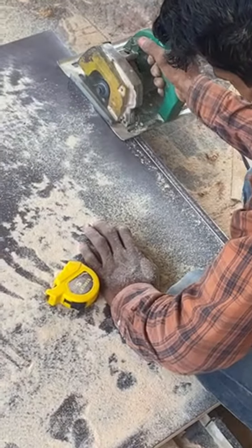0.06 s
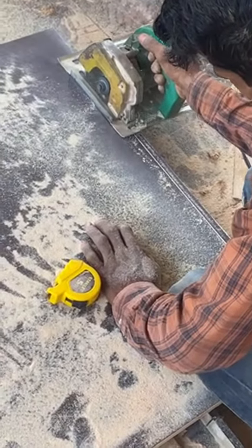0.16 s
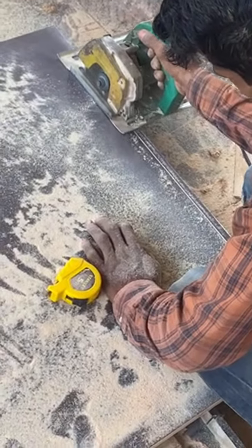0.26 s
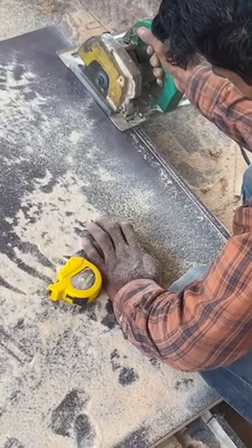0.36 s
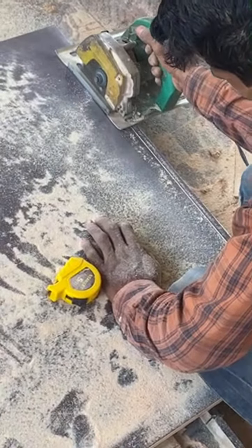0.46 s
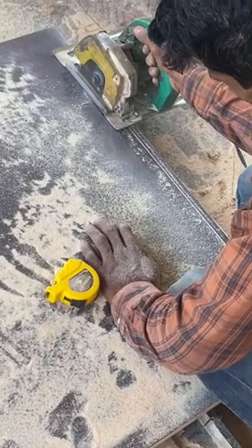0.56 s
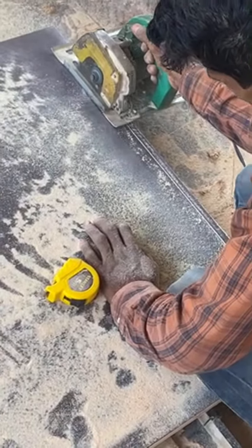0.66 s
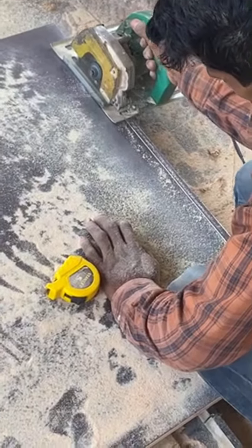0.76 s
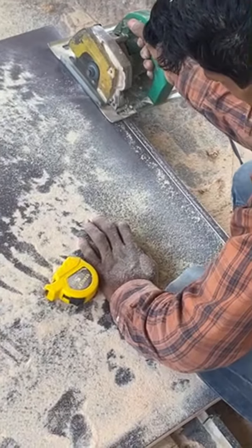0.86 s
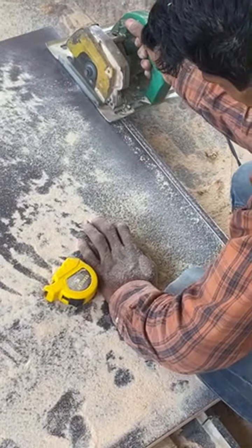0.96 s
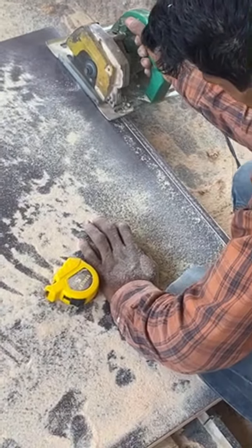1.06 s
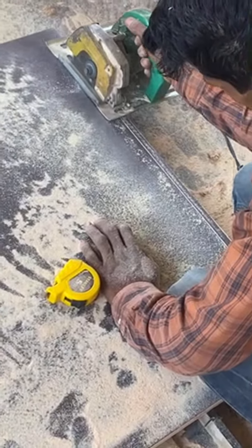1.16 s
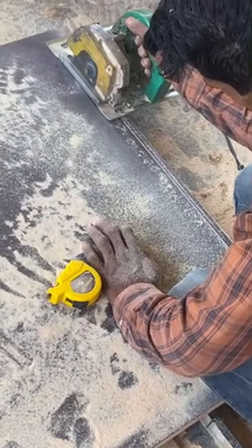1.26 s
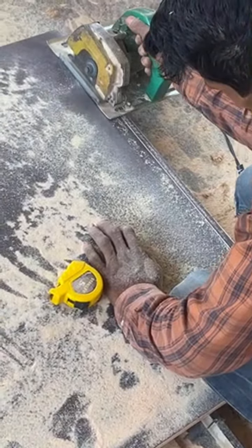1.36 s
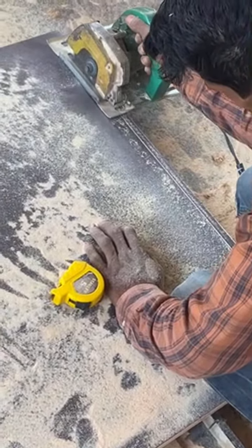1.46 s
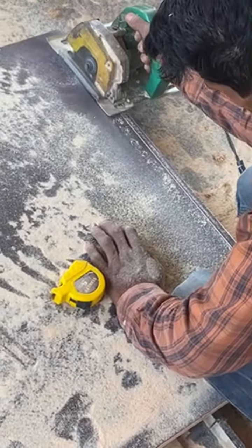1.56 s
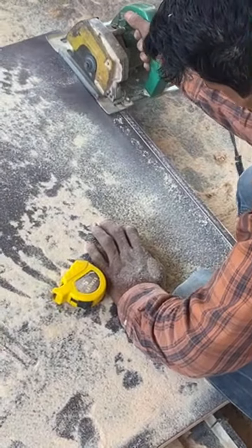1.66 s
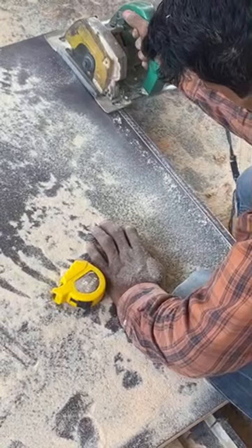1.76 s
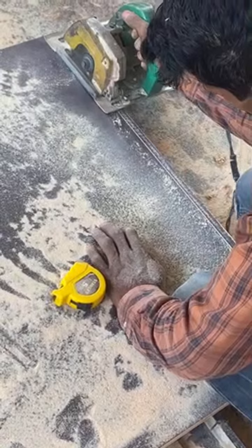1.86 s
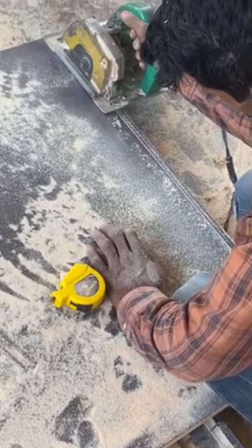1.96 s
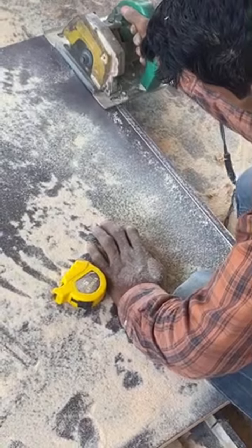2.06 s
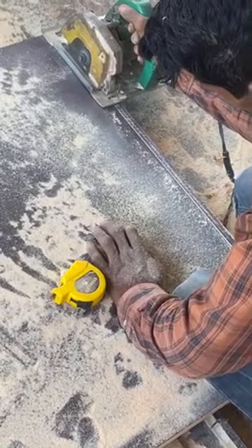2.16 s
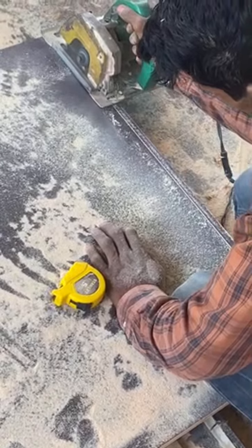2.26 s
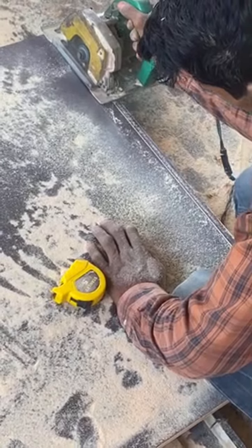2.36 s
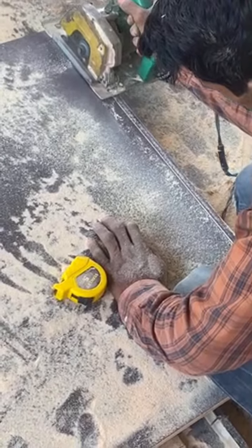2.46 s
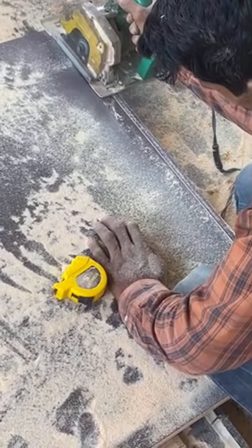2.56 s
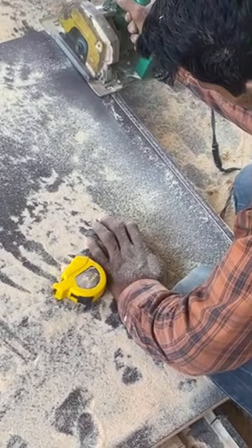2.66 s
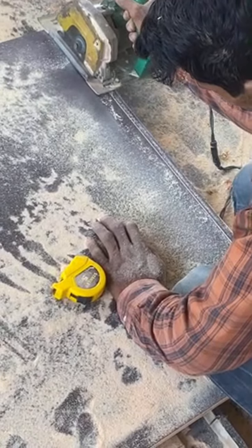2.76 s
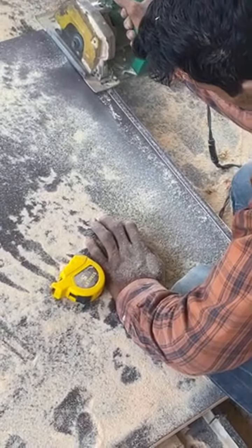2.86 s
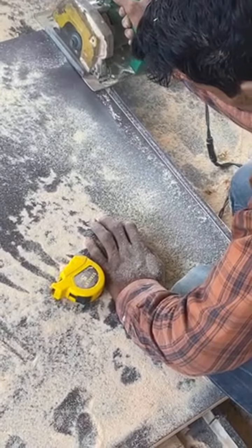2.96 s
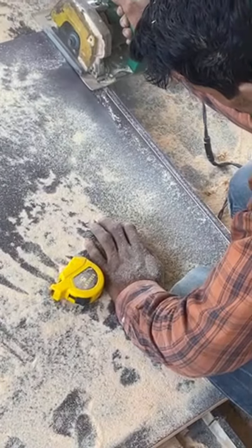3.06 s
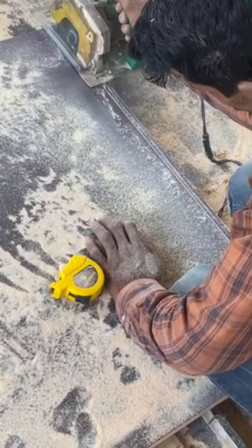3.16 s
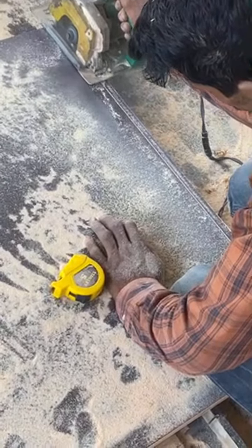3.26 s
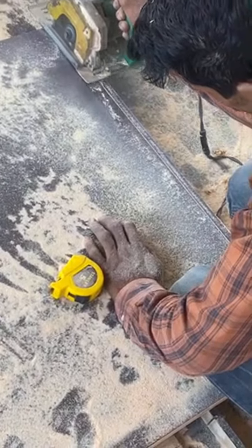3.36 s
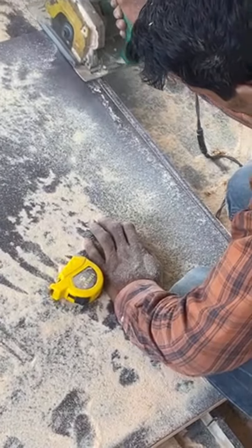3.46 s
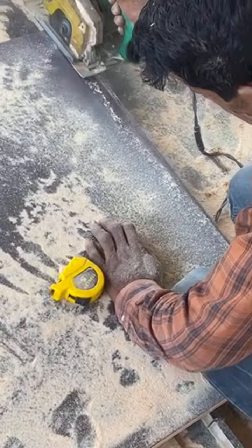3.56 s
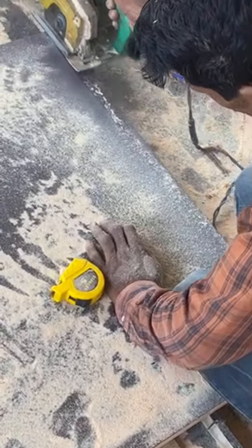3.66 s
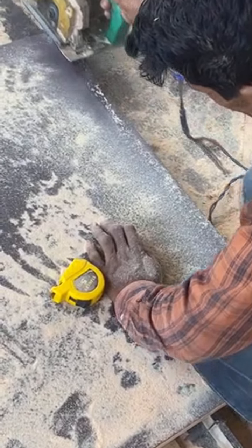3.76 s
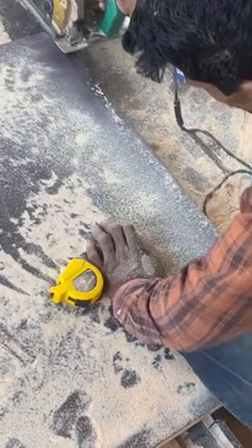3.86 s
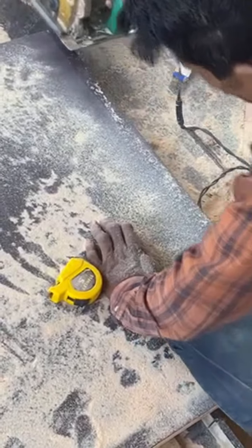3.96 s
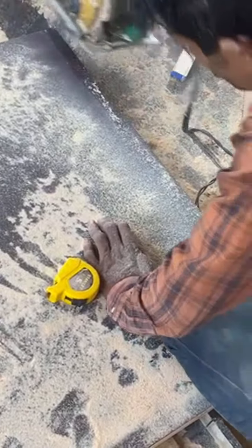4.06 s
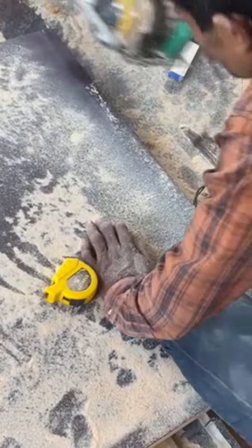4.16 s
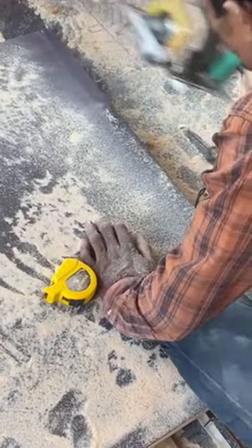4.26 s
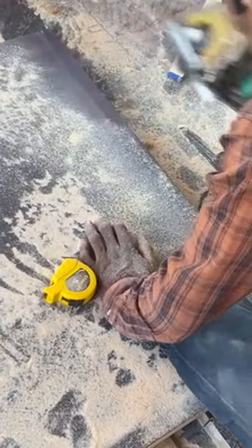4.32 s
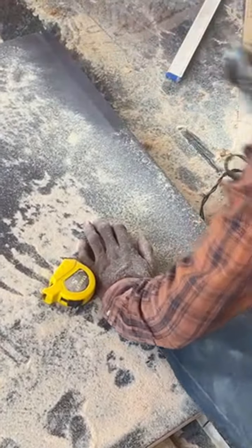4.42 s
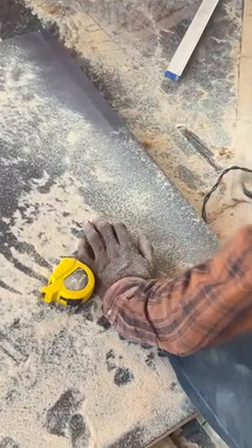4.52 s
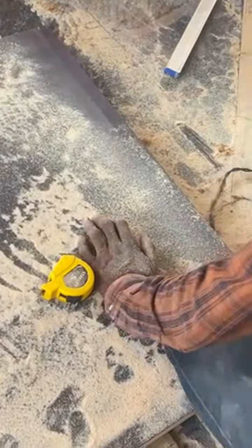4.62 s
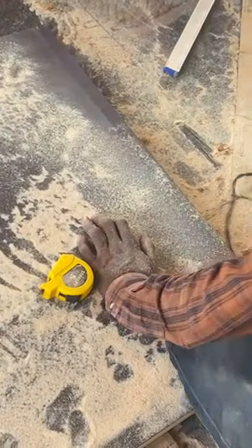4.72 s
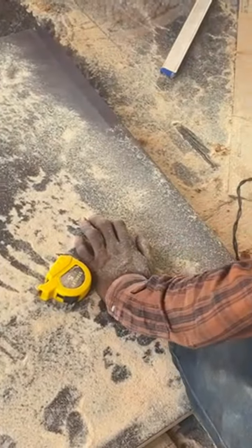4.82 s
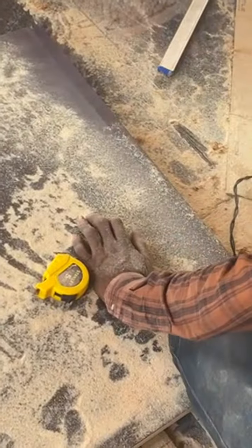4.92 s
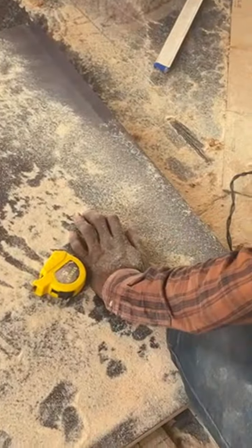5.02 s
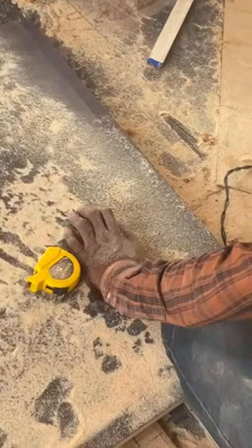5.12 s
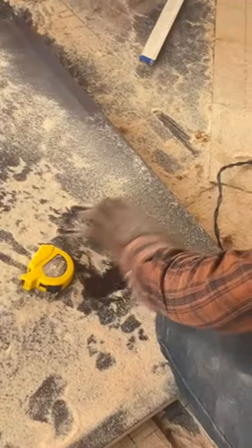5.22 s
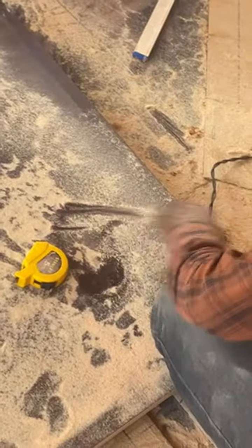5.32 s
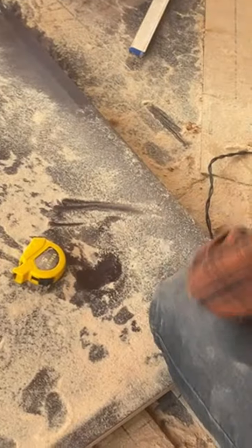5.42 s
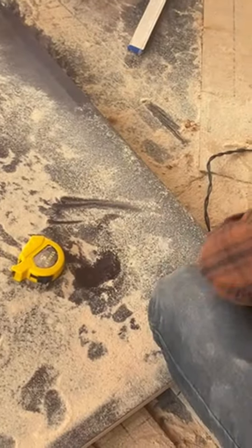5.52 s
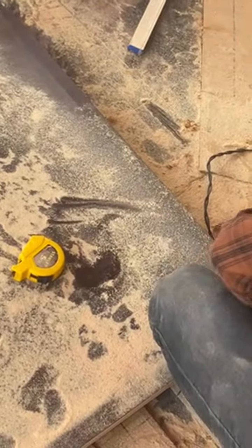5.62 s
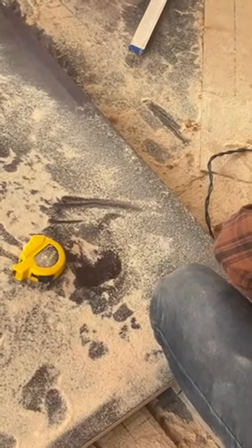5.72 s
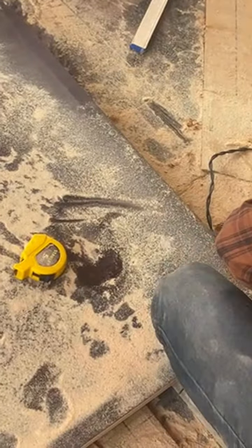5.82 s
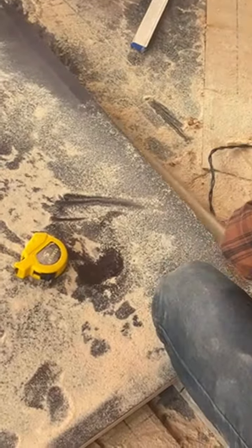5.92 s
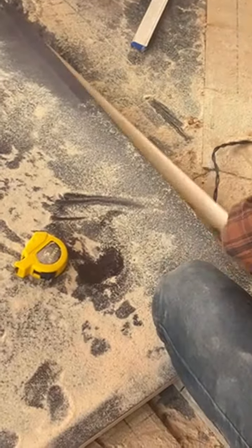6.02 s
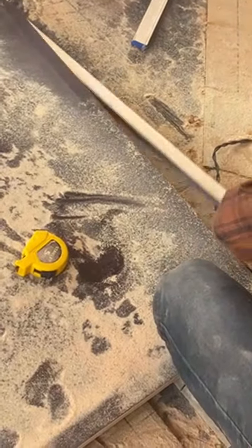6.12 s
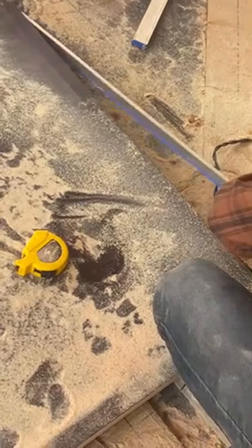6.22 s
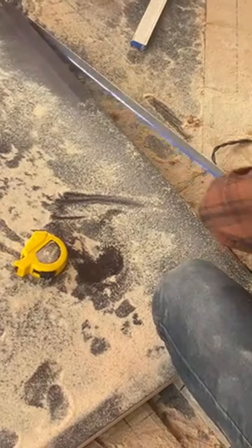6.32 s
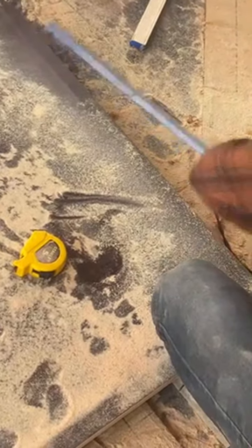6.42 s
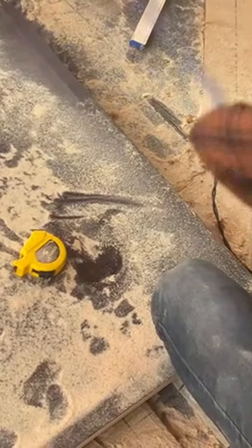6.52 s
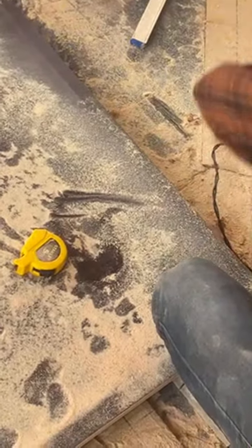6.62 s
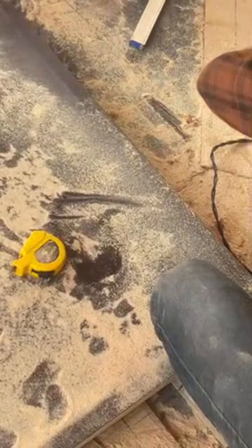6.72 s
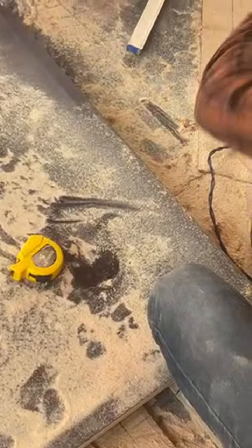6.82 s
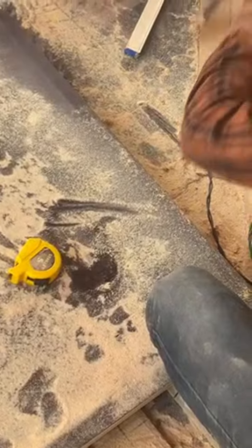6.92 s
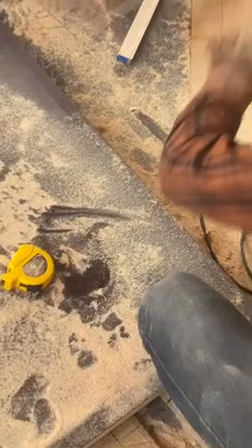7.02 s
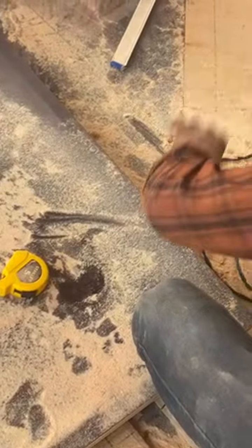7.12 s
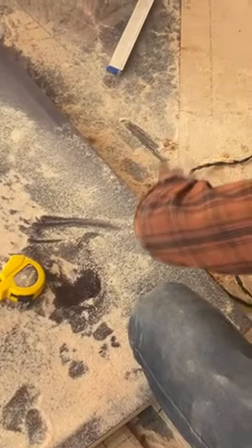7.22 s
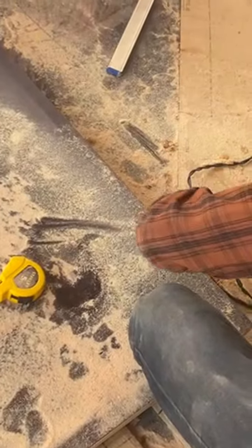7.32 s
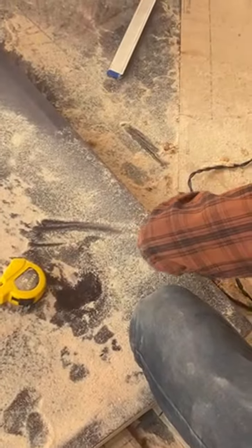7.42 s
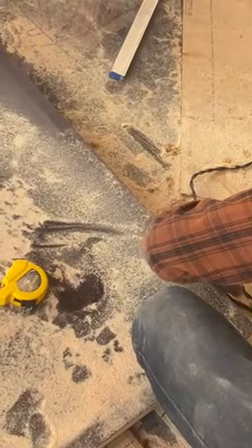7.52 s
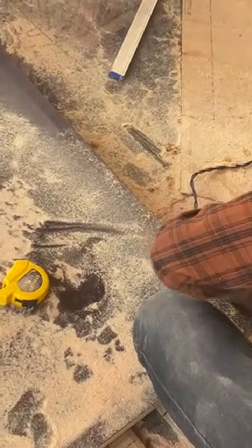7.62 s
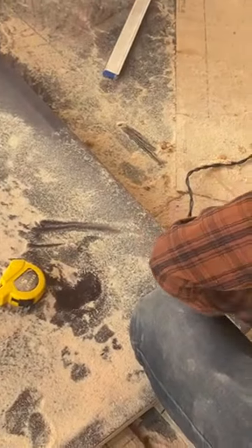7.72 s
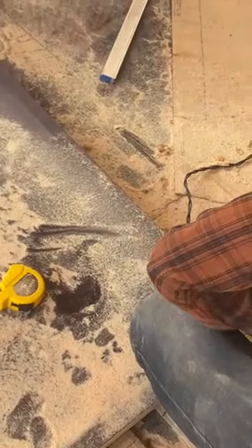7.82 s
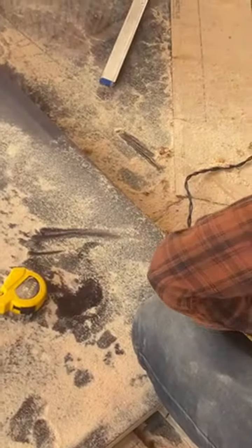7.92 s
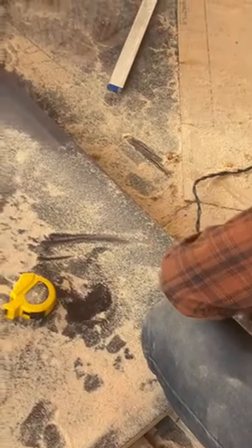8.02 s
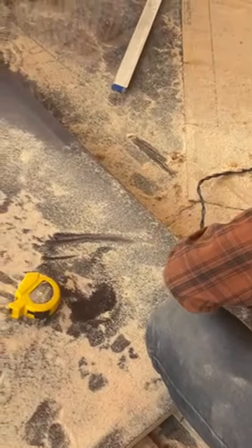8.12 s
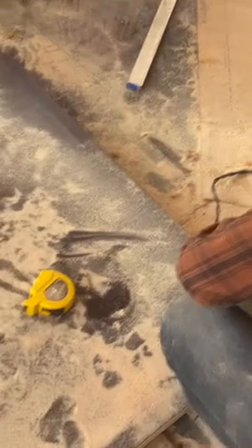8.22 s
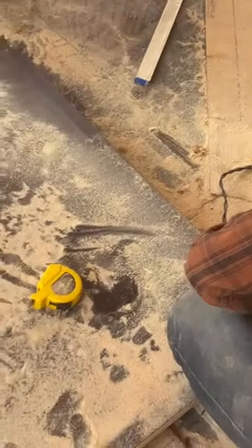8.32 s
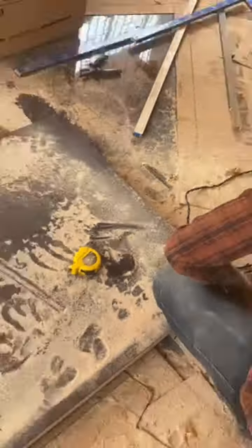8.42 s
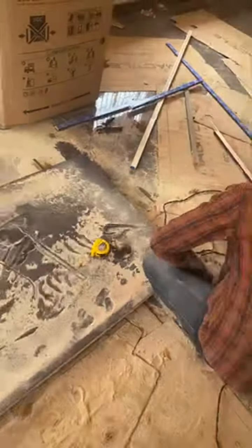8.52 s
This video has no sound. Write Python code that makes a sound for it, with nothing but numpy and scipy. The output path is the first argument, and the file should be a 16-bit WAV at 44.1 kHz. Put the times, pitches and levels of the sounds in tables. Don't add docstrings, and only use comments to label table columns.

```python
import sys
import numpy as np
from scipy import signal
from scipy.fft import rfft, irfft, next_fast_len
from scipy.io import wavfile
from scipy.ndimage import uniform_filter1d, map_coordinates

SR = 44100
rng = np.random.default_rng(int(sys.argv[2]) if len(sys.argv) > 2 else 0)


def int16_out(signal):
    q = np.round(np.clip(np.atleast_2d(signal).T, -1, 1) * 32767)
    wavfile.write(sys.argv[1], SR, q.astype(np.int16))


def ratio(d):
    e = np.asarray(d, float) / 20
    return 10 ** e


N = 378359
TIME_S = np.arange(N) / SR
MAINS_PHASE = 2 * np.pi * 100 * TIME_S
EXIT_S = 3.77


def unit(x):
    return x / np.sqrt(np.mean(x ** 2) + 1e-20)


def curves(rows):
    s, *columns = np.transpose(rows)
    return [np.interp(TIME_S, s, column) for column in columns]


def wobble(rate_hz):
    coarse = np.arange(0, N + 32, 32)
    knots = rng.standard_normal(int(N * rate_hz / SR) + 4)
    return np.interp(np.arange(N), coarse, map_coordinates(knots, [coarse * rate_hz / SR]))


def swells(weights, middle_s, half_s):
    coarse = np.arange(0, N + 32, 32)
    distance = coarse / SR - np.asarray(middle_s)[:, None]
    bells = np.exp(-(distance / np.asarray(half_s)[:, None]) ** 2)
    return np.interp(np.arange(N), coarse, weights @ bells)


def filtered(x, response):
    m = next_fast_len(N + 8192)
    spectrum = rfft(x, m) * response(np.fft.rfftfreq(m, 1 / SR))
    return unit(irfft(spectrum, m)[:N])


def below(x, top_hz):
    m = next_fast_len(N)
    return irfft(rfft(x, m) * (np.fft.rfftfreq(m, 1 / SR) < top_hz), m)[..., :N]


def colour(points):
    freq_hz, level_db = np.transpose(points)
    return lambda hz: ratio(np.interp(np.log(hz + 1), np.log(freq_hz + 1), level_db))


def body(peaks, base, lo_hz, hi_hz):
    def response(f):
        power = base(f) ** 2
        for centre_hz, width_hz, level_db in peaks:
            power = power + ratio(2 * level_db) / (1 + ((f - centre_hz) / (width_hz / 2)) ** 2)
        return np.sqrt(power / (1 + (lo_hz / (f + 1)) ** 12) / (1 + (f / hi_hz) ** 12))
    return response


def moving(push, early, late, start_s, end_s):
    share, = curves([(start_s, 0), (end_s, 1)])
    return unit((1 - share) * filtered(push, early) + share * filtered(push, late))


def tuned(hz, peaks):
    power = 0
    for centre_hz, width_hz, level_db in peaks:
        power = power + ratio(2 * level_db) / (1 + ((hz - centre_hz) / (width_hz / 2)) ** 2) ** 2
    return np.sqrt(power)


def noise():
    return rng.standard_normal(N)


def patchy(depth_db, size=(5, 8)):
    z = signal.stft(rng.standard_normal(N + 512), nperseg=512)[2]
    field = uniform_filter1d(rng.standard_normal(z.shape), size[0], 0)
    field = uniform_filter1d(field, size[1], 1)
    return signal.istft(z * ratio(depth_db * unit(field)), nperseg=512)[1][:N]


# time_s, speed_turns_per_s
LOAD = [(0, 123.6), (.6, 124), (1, 125.2), (1.4, 127.5), (1.9, 129), (2.05, 132), (2.25, 134), (2.65, 138),
        (3.5, 148), (3.72, 160), (3.9, 167)]


def blade_speed():
    off_s, free_turns, friction_turns, slowing_per_s = 3.9, 169.8, 100, .08
    decay = np.exp(-slowing_per_s * (TIME_S - off_s))
    coasting = (free_turns + friction_turns) * decay - friction_turns
    return np.minimum(curves(LOAD)[0], coasting)


def chatter(angle, depth_db, beat, size=(5, 8)):
    return patchy(depth_db, size) * (1 + beat * np.cos(angle) + 0.62 * beat * np.cos(MAINS_PHASE))


def throb():
    return 2 * np.pi * 6.55 * (TIME_S - .085), 1 / (1 + (TIME_S / 1.9) ** 4)


# blade_order, mains_order, level_db
BEATS = [(2, -1, 1.5), (0, 2, 0), (1, 1, 3), (2, 0, 9.5), (2, 1, 2.5), (3, 0, 2.5), (1, 3, -2), (3, 1, -1),
         (4, -1, 1.5), (4, 0, 3), (4, 1, -30.5), (5, 0, -3), (5, 1, 1), (6, 0, -9.5), (7, 0, 0),
         (6, 1, -13.5)]
TWINS = {(2, 0): .6, (4, 0): .8, (4, -1): .6, (3, 1): .3}


def blade_push(angle):
    throb_phase, throb_share = throb()
    twin = np.exp(-1j * throb_phase) * throb_share
    beats = np.zeros(N)
    for blade_order, mains_order, level_db in BEATS:
        level = ratio(level_db + 1.2 * wobble(9))
        phase = blade_order * angle + mains_order * MAINS_PHASE + .55 * wobble(10)
        partner = 1 + TWINS.get((blade_order, mains_order), 0) * twin
        beats += level * np.real(np.exp(1j * phase) * partner)
    beat_db = -9.5 - 8 * np.clip(TIME_S - 1.6, 0, 1)
    return ratio(beat_db) * unit(beats) + chatter(angle, depth_db=1, beat=.4)


# middle_s, half_s, level_db
HEAVES = [
    (0.199, 0.15, -2.5),
    (0.498, 0.14, -1.5),
    (1.2, 0.21, 1.5),
    (1.75, 0.18, 0),
    (2.1, 0.14, 0),
    (2.55, 0.18, 1),
    (3.4, 0.12, -0.5),
]
# middle_s, half_s, level_db
SAGS = [
    (.1, 0.14, -1.5),
    (.5, 0.14, -1),
    (1.05, .16, -4),
    (1.3, .1, 3),
    (1.85, .12, 1.5),
    (2.1, .08, -1.5),
    (2.8, 0.14, 3),
    (3.2, 0.16, -2),
]
# centre_hz, width_hz, level_db
TILE_IN = [(206.3, 17, -1), (230, 7.3, 3), (226, 61, -11.5), (345, 20, 0), (410, 22, -8), (461, 14, 2.5),
           (482, 30, -3), (591, 37, -7), (686, 13, -2), (810, 46, -2.5), (867, 20, -12.5),
           (1106, 50, -23.5)]
# centre_hz, width_hz, level_db
TILE_OUT = [(221.7, 27.6, -0.5), (290.7, 21, -5.5), (345.5, 5.8, 4.5), (407.6, 14.6, 0), (488, 27, -2.5),
            (570, 16, -3.5), (684, 26, 0.5), (769, 12, -1.5), (786, 110, -6), (1070, 39, -9),
            (1204, 64, -7.5)]


def tile(push):
    flat = lambda hz: ratio(-24.0)
    early = body(TILE_IN, flat, lo_hz=174, hi_hz=570)
    late = body(TILE_OUT, flat, lo_hz=189, hi_hz=555)
    boom = moving(push, early, late, 2.16, 1.4)
    low, high = below(boom, 295), boom - below(boom, 388)
    middle = boom - low - high
    throb_phase, throb_share = throb()
    throb_db = 2.2 * np.cos(throb_phase) * throb_share
    middle_s, half_s, heave_db = np.transpose(HEAVES)
    low_db = .4 * throb_db + swells(heave_db, middle_s, half_s)
    middle_s, half_s, sag_db = np.transpose(SAGS)
    high_db = throb_db + swells(sag_db, middle_s, half_s)
    boom = ratio(low_db) * low + middle + ratio(high_db) * high
    early = body(TILE_IN, flat, lo_hz=543, hi_hz=1110)
    late = body(TILE_OUT, flat, lo_hz=565, hi_hz=1250)
    return boom, moving(push, early, late, 1.87, 2.63)


# freq_hz, level_db_per_hz
GRIT = [(590, -28.5), (1000, 4.5), (1080, -11), (1350, 2.5), (1640, -5.5), (1860, -0.5), (2220, -3.5),
        (2500, 1), (3130, -14.5), (3400, -22), (4420, -49), (7480, -120)]


def grit_noise(angle):
    return filtered(chatter(angle, depth_db=3.5, beat=0.071, size=(1, 10)), colour(GRIT))


# freq_hz, level_db_per_hz
RATTLE = [(1650, -44.5), (2800, -4), (3140, -29), (3820, -5.5), (5110, -8.5), (5900, -13.5), (7020, 3.5),
          (9450, -9), (10100, 2), (10900, -11.5), (11600, -6.5), (12600, -12.5), (13800, -9), (15800, -12)]
# centre_hz, width_hz, level_db
DISC_IN = [(3540, 80, -12), (4360, 300, -10), (5115, 150, -6), (7150, 110, -7), (8300, 100, -10.5),
           (8670, 44, -9), (8970, 33, -4), (9880, 180, -9), (10400, 50, -17), (11500, 230, -20.5),
           (13600, 150, -18.5), (15170, 275, -17.5)]
# centre_hz, width_hz, level_db
DISC_OUT = [(3430, 74, -8.5), (4200, 150, -12.5), (5280, 140, -4.5), (6000, 200, -10.5), (7150, 38, -6),
            (8260, 89, -8), (8850, 120, -7.5), (10060, 88, -17), (10500, 41, -9.5), (11600, 300, -13),
            (13700, 320, -18), (15100, 160, -20)]
# centre_hz, width_hz, level_db
DISC_FREE = [(6430, 70, 2), (7000, 80, 0), (7090, 60, -6), (8650, 60, 5), (8920, 60, -7), (9300, 50, -7.5),
             (10030, 130, 3), (10700, 50, -4), (11840, 100, -0.5), (12200, 60, -7), (13620, 70, -5.5),
             (13850, 120, -7), (15180, 90, -10), (15470, 110, -9)]


def disc_ring(angle):
    steel = lambda hz: ratio(-13) * colour(RATTLE)(hz)
    bite = chatter(angle, depth_db=3.5, beat=0.068, size=(2, 12))
    early = body(DISC_IN, steel, lo_hz=2920, hi_hz=17000)
    late = body(DISC_OUT, steel, lo_hz=2900, hi_hz=17000)
    held = moving(bite, early, late, 1.9, 3.05)
    loose = filtered(bite, body(DISC_FREE, steel, lo_hz=2900, hi_hz=17000))
    free, = curves([(3.57, 0), (3.69, 0.88)])
    return np.sqrt(1 - free) * held + np.sqrt(free) * loose


# freq_hz, level_db_per_hz
BOOM = [(18, -74.5), (30, -57.5), (70, -5.5), (107, -3), (135, 3.5), (190, -9.5), (250, -36), (420, -120)]
# centre_hz, width_hz, level_db
SLAB_MODES = [(127.2, 2.8, -34), (143.5, 11.6, -26.5), (162.4, 11, -36.5)]


def slab(angle, turns, rumble_db):
    shake = tuned(turns, SLAB_MODES) * ratio(-160 * np.clip(TIME_S - 4.02, 0, None))
    rumble = ratio(rumble_db) * filtered(noise(), colour(BOOM))
    return rumble + shake * ratio(2.95 * wobble(7.01)) * np.cos(angle)


# time_s, pressure_db, loose_offcut_0_to_1
FEED = [(0, -2, 0.1), (.6, -2, 0.17), (.9, -2.5, 0.07), (1.45, -2.5, 0.23), (1.9, -1, 0), (2.2, 1, 0.88),
        (2.8, 0.7, 1.04), (3.1, 0, 0.83), (3.49, 1, 0.73), (3.6, -3, 0.25), (3.68, -6, 0.3),
        (3.78, 0, 0.44)]
# middle_s, half_s, extra_db
RUBS = [
    (.2, 0.055, 1),
    (.62, 0.13, 0.5),
    (1.4, 0.32, -2),
    (1.66, 0.031, 1),
    (1.82, .1, 1.5),
    (3.42, 0.12, -0.5),
    (3.575, 0.058, -4),
    (3.776, .1, 2),
]


def cut(angle, turns):
    press_db, loose = curves(FEED)
    out_s = np.clip(TIME_S - EXIT_S, 0, None)
    middle_s, half_s, extra_db = np.transpose(RUBS)
    rub_db = swells(extra_db, middle_s, half_s)
    boom_db = -19.5 + press_db - 106 * out_s
    rattle_db = -25.5 + press_db + 2 * loose + 0.39 * wobble(18) - 200 * out_s
    grit_db = -25.5 + 0.61 * press_db - 1.46 * loose + 0.27 * rub_db - 95 * out_s
    disc_db = -29 + .3 * press_db - 4.5 * loose + rub_db - 98 * out_s
    rumble_db = -46.5 + 9.5 * loose - 38 * out_s
    boom, rattle = tile(blade_push(angle))
    stone = ratio(boom_db) * boom + ratio(rattle_db) * rattle + ratio(grit_db) * grit_noise(angle)
    return stone + ratio(disc_db) * disc_ring(angle) + slab(angle, turns, rumble_db)


# middle_s, half_s, gear_mesh_db, rim_segments_db
MESHING = [(0.36, 0.049, -34, -32), (0.504, 0.053, -43, -38), (0.61, 0.066, -38.5, -38),
           (0.725, 0.066, -40.5, -32), (0.905, 0.12, -35.5, -36.5), (0.999, 0.045, -42, -46),
           (1.274, 0.16, -41.5, -59), (1.48, 0.06, -38.5, -51), (1.66, 0.047, -33, -49),
           (2.1, 0.12, -44, -45.5), (2.256, 0.078, -45.5, -35.5), (2.4, 0.11, -41, -43.5),
           (2.6, 0.11, -43.5, -54), (3.15, .12, -51, -65)]
# middle_s, half_s, pitch_hz, level_db, overtone_db
SQUEAL = [
    (1.62, .065, 5138, -26, -46),
    (1.81, .075, 5141, -26, -44),
    (1.96, .045, 5170, -29, -43),
    (2.04, .04, 5240, -35, -44),
    (2.09, .05, 5200, -50, -38),
    (3.855, .035, 5390, -41, -73),
    (3.93, .045, 5385, -46, -76),
]


def whine(angle):
    middle_s, half_s, mesh_db, rim_db = np.transpose(MESHING)
    mesh = swells(ratio(mesh_db), middle_s, half_s)
    rim = swells(ratio(rim_db), middle_s, half_s)
    slots = ratio(-37 + 1.4 * wobble(7.75) - 35 * np.clip(TIME_S - 1.7, 0, None))
    looseness, = curves([(1.9, .6), (2.15, 1.2)])
    size = lambda: np.sqrt(2) * ratio((2 + 1.8 * looseness) * wobble(40))
    drift = lambda: looseness * wobble(90)
    out = np.zeros(N)
    for order, level in [(37, mesh), (20, rim), (9, slots)]:
        out += level * size() * np.cos(order * angle + drift())
    ring, ring_drift = (1 + .12 * np.cos(angle)) * size(), drift()
    high, high_drift = size(), drift()
    for middle_s, half_s, pitch_hz, level_db, overtone_db in SQUEAL:
        k = slice(round((middle_s - 3 * half_s) * SR), round((middle_s + 3 * half_s) * SR))
        phase = 2 * np.pi * pitch_hz * TIME_S[k]
        pair = ratio(level_db) * ring[k] * np.cos(phase + ring_drift[k])
        pair += ratio(overtone_db) * high[k] * np.cos(2 * phase + high_drift[k])
        out[k] += np.exp(-((TIME_S[k] - middle_s) / half_s) ** 2) * pair
    return out


# middle_s, length_s, pitch_hz, level_db
SINGING = [(.12, 0.1, 7250, -37), (0.724, .08, 7360, -36.5), (0.946, 0.24, 9100, -41.5),
           (.95, 0.22, 10000, -38), (1.371, 0.098, 2394, -32), (1.823, 0.02, 2640, -24),
           (1.88, 0.084, 6840, -35.5), (1.89, .04, 2430, -30), (1.96, 0.032, 2430, -24),
           (2.05, .03, 2430, -28), (2.09, 0.036, 2526, -29), (2.125, 0.028, 2560, -27.5),
           (2.175, 0.027, 2565, -26.5), (2.15, 0.11, 10140, -40), (2.715, 0.091, 2730, -37.5),
           (2.84, 0.076, 3290, -41), (.14, 0.082, 1870, -34.5), (.18, 0.043, 2480, -30.5),
           (.31, 0.064, 1826, -30), (.45, .04, 1850, -32), (.57, .05, 1860, -33.5), (3.05, 0.16, 6900, -43),
           (3.25, 0.16, 2790, -37), (3.35, 0.16, 7150, -33), (2.55, .05, 7140, -34.5),
           (2.55, .07, 5150, -38.5), (3.15, .18, 5350, -42.5), (3.4, 0.055, 5920, -42),
           (3.71, 0.068, 6430, -35.5), (3.79, .09, 6860, -36.5), (.22, .07, 810, -28.5),
           (1.88, .07, 1780, -32.5), (2.06, 0.12, 145, -33), (2.29, .06, 790, -24.5),
           (2.42, .09, 681, -21.5), (2.75, .12, 698, -31), (2.88, .09, 575, -24), (3.2, .22, 482, -22),
           (3.32, .08, 797, -27.5), (3.63, .08, 207.6, -27.5), (3.68, .15, 411, -26.5),
           (3.78, .1, 347, -22.5), (3.92, .12, 336.5, -39), (3.97, .12, 305.5, -44),
           (1.25, 0.13, 1160, -46.5), (1.65, .18, 1157, -42.5), (3.17, 0.12, 1350, -38),
           (1.6, 0.3, 152, -34.5), (2.2, .4, 170, -40), (3.33, .25, 153, -31.5), (2.9, .3, 130, -52),
           (1.45, .2, 510, -24), (1.45, .2, 640, -34), (2.3, .25, 407, -34.5), (2.75, 0.17, 360, -31.5),
           (2.45, .2, 270, -32), (2.9, 0.18, 290, -24.5), (3.25, .3, 210, -25.5), (3.2, .2, 360, -27.5),
           (2.82, 0.18, 510, -27), (1.9, .2, 630, -28), (1.1, 0.27, 350, -26.5), (.4, .3, 310, -31),
           (2.31, 0.026, 5300, -37), (2.54, 0.037, 5240, -38), (2.72, .04, 5270, -37.5),
           (2.98, 0.036, 5350, -40), (3.37, .025, 5270, -37), (3.46, .025, 5300, -38),
           (3.52, .025, 5330, -37.5), (3.4, 0.092, 7100, -38.5), (0.27, .15, 4955, -44),
           (2.55, 0.056, 225, -24.5), (2.5, .05, 225, -25), (3.1, .15, 350, -27.5), (6, .25, 1000, -50),
           (4.3, .1, 1450, -46), (2.72, 0.068, 570, -25), (.55, .1, 815, -31.5), (.5, .15, 695, -34.5),
           (3.85, 0.0305, 2500, -34.5)]


def singing():
    out, unsteady = np.zeros(N), wobble(70)
    for middle_s, length_s, pitch_hz, level_db in SINGING:
        t = np.arange(round(1.83 * length_s * SR)) / SR
        start = round((middle_s - .8 * length_s) * SR)
        waver = unsteady[start:][:len(t)]
        tone = np.sin(2 * np.pi * pitch_hz * t + .6 * waver)
        out[start:][:len(t)] += ratio(level_db + 3 + 3 * waver) * np.hanning(len(t)) * tone
    return out


# time_s, pitch_hz, level_db
RISING_MODE = [
    (2.6, 11350, -62),
    (2.9, 11400, -50.5),
    (3.3, 11620, -51.5),
    (3.55, 11600, -47),
    (3.75, 11830, -60),
]


def rising_mode():
    pitch_hz, level_db = curves(RISING_MODE)
    band = filtered(noise(), lambda f: 1 / (1 + (f / 130) ** 4))
    on = (pitch_hz > RISING_MODE[0][1]) & (pitch_hz < RISING_MODE[-1][1])
    return on * np.sqrt(2) * ratio(level_db) * band * np.cos(2 * np.pi * np.cumsum(pitch_hz) / SR)


# freq_hz, level_db_per_hz
SITE = [(18, -72), (30, -52), (67, -11), (92, -0.5), (168, -6.5), (289, -2), (526, -2), (785, 1.5),
        (1460, -2), (1680, -5.5), (2230, -2.5), (3070, -20.5), (3600, -34.5), (4680, -52), (7920, -120)]
# freq_hz, level_db_per_hz
HISS = [(1650, -34), (2800, 0), (3120, -6), (3580, 1.5), (3910, -2), (4550, -2), (5650, -7), (7120, -3),
        (8420, -8.5), (9110, -10.5), (12500, -17.5), (14000, -18), (15800, -23)]
# freq_hz, level_db_per_hz
CAPSULE = [(2500, -43.5), (4000, 0.5), (9000, -5), (13100, -13), (13700, -2), (14300, -8.5), (15700, -10)]
# centre_hz, blade_order, reach_hz, level_db
VENTS = [(6100, 37.4, 500, -50), (5780, 38.3, 800, -48.5), (4750, 36, 500, -54), (8300, 67.5, 900, -66),
         (7200, 65, 500, -61), (6800, 66, 700, -59.5), (6280, 66.5, 1300, -63), (4500, 38.5, 800, -57),
         (3520, 36, 1700, -57)]
# centre_hz, width_hz, level_db
RIM_CAVITIES = [(2440, 30, -5), (2270, 50, -9), (1900, 70, -8.5)]
# middle_s, half_s, hiss_db, hum_db
PUFFS = [(4.751, 0.091, -2, 0), (4.86, .04, 0, 2), (5.3, 0.022, 0, 0), (6.067, 0.13, 4.5, 1.3),
         (6.743, .03, 7.5, -1), (6.83, 0.037, 6, 1), (6.903, 0.036, 7, 0), (7.009, 0.03, 6.5, 1.5),
         (7.21, .025, 3, 0), (7.41, .03, 1.5, 0), (7.54, .02, 4, 0), (7.691, .025, 6, 1),
         (8.3, .04, 6.5, 1), (8.554, .03, 5.5, 4)]


def run_down(angle, turns):
    speed_db = 20 * np.log10(turns / 169.8)
    ease_s = 0.21
    under_cut_db = 2 * np.clip((EXIT_S + ease_s - TIME_S) / ease_s, 0, 1)
    middle_s, half_s, puff_db, hum_db = np.transpose(PUFFS)
    near_power, far_power = ratio(2 * (-33 + 1.3 * speed_db)), ratio(2 * -51)
    site_db = 10 * np.log10(near_power + far_power) + 0.63 * under_cut_db + swells(hum_db, middle_s, half_s)
    hiss_db = -44.5 + 3.55 * speed_db + under_cut_db + swells(puff_db, middle_s, half_s) + 1.1 * wobble(11)
    fan_db = -43 + 3.5 * speed_db + 0.77 * under_cut_db

    def streaky(width_hz, depth_db):
        return filtered(patchy(depth_db, size=(2, 9)), lambda hz: 1 / (1 + (hz / width_hz) ** 4))

    site = filtered(patchy(depth_db=1.44), colour(SITE))
    fan = ratio(fan_db + .3 + 1.5 * wobble(8)) * streaky(width_hz=780, depth_db=4.6) * np.cos(38.5 * angle)
    for order in (33, 35.5, 37.5, 39.5, 42, 44):
        strand = ratio(4.5 * wobble(16)) * np.cos(order * angle + 1.1 * wobble(70))
        fan += ratio(fan_db - 14.5) * strand
    flutter, vent = streaky(width_hz=260, depth_db=3.4), np.zeros(N)
    for centre_hz, order, reach_hz, level_db in VENTS:
        level = tuned(order * turns, [(centre_hz, reach_hz, level_db)]) * ratio(1.8 * wobble(30))
        carrier = np.cos(2 * np.pi * centre_hz * TIME_S)
        vent += level * np.roll(flutter, centre_hz) * carrier
    hiss = filtered(patchy(depth_db=2.2, size=(4, 6)), colour(HISS))
    rim = tuned(21 * turns, RIM_CAVITIES) * ratio(3 * wobble(16)) * np.cos(21 * angle + .8 * wobble(45))
    capsule = ratio(-65.5) * filtered(noise(), colour(CAPSULE))
    return ratio(site_db) * (site + rim) + fan + vent + ratio(hiss_db) * hiss + capsule


# start_s, dull_db, gritty_db, rise_s, t60_s
SCRAPES = [
    (7.185, -31, -31, .0005, 0.05),
    (7.192, -32, -38, 0.004, 0.4),
    (7.376, -42, -34, .002, .06),
    (7.388, -38, -30, 0.008, 0.35),
    (7.47, -42, -37, .03, 0.3),
    (7.503, -45, -38, 0.006, 0.3),
]
# freq_hz, level_db_per_hz
OFFCUT = [(71, -37), (120, 1), (266, -3), (534, -2), (812, -2), (2290, -7), (2680, -40), (4590, -31),
          (14000, -37)]
# freq_hz, level_db_per_hz
SLIDE = [(530, -39), (900, -11), (1180, -5.5), (1550, -7), (2180, -3.5), (2630, -14.5), (4850, -26),
         (5920, -26), (15000, -56)]


def offcut():
    dull, gritty = np.zeros(N), np.zeros(N)
    for start_s, dull_db, gritty_db, rise_s, t60_s in SCRAPES:
        age_s = np.clip(TIME_S - start_s, 0, 1)
        shape = ratio(-60 * age_s / t60_s) * (1 - np.exp(-age_s / rise_s))
        dull += ratio(dull_db) * shape
        gritty += ratio(gritty_db) * shape
    grains = ratio(2.1 * wobble(400))
    scuff = dull * filtered(noise(), colour(OFFCUT))
    drag = gritty * filtered(patchy(depth_db=1, size=(6, 3)), colour(SLIDE))
    return grains * (scuff + drag)


# start_s, level_db, start_hz, end_hz, t60_s
KNOCKS = [(7.1855, -23.5, 1500, 1150, .012), (7.201, -30, 900, 750, .012), (7.377, -27, 1700, 1500, .006),
          (7.393, -28, 1400, 1250, .016), (7.505, -26.5, 2150, 2000, .014), (7.402, -48, 4800, 4700, .03),
          (7.525, -47, 4600, 4500, .03), (7.499, -28, 1800, 1600, .005), (7.192, -31, 320, 300, .04),
          (7.205, -32, 580, 540, .06), (7.398, -34, 1300, 1280, .04), (8.3453, -12, 1500, 700, 0.0025),
          (8.3465, -8.5, 580, 240, .011), (8.3488, -12.5, 240, 200, .011),
          (8.3495, -18.5, 2530, 2300, 0.0025), (8.3531, -7.5, 215, 150, 0.015),
          (8.3633, -20.5, 80, 74, 0.078), (8.535, -38, 90, 80, 0.11)]


def knocks():
    out, t = np.zeros(N + SR), np.arange(SR // 4) / SR
    for start_s, level_db, start_hz, end_hz, t60_s in KNOCKS:
        pitch_hz = end_hz + (start_hz - end_hz) * np.exp(-t / 0.0031)
        shape = ratio(level_db - 60 * (t / t60_s) ** 1.86) * (1 - np.exp(-t / 0.00028))
        out[round(start_s * SR):][:len(t)] += shape * np.sin(2 * np.pi * np.cumsum(pitch_hz) / SR)
    return out[:N]


def scene():
    turns = blade_speed()
    angle = 2 * np.pi * np.cumsum(turns) / SR
    cutter = cut(angle, turns) + whine(angle) + singing() + rising_mode() + run_down(angle, turns)
    return (cutter + offcut() + knocks())[None]


# start_s, fall_s, mute_s, return_s, depth_db
MUTES = [
    (.043, .0028, .0037, .0025, -16),
    (.756, .025, .001, .026, -13.5),
    (5.555, .2, .027, .005, -82),
    (5.781, .003, .001, .014, -16),
]


def dropouts():
    gain_db = np.zeros(N)
    for start_s, fall_s, mute_s, return_s, depth_db in MUTES:
        down_s = start_s + fall_s
        up_s = down_s + mute_s
        gain_db += curves([(start_s, 0), (down_s, depth_db), (up_s, depth_db), (up_s + return_s, 0)])[0]
    return ratio(gain_db)


def roll_off(x):
    return signal.sosfilt(signal.butter(12, 16040, fs=SR, output="sos"), x)


def record(dry):
    ceiling = .85
    rounded = dry / (1 + np.abs(dry / ceiling) ** 4) ** .25
    mix = below(rounded * dropouts(), top_hz=15740)
    return roll_off(mix)


dry = scene()
out = record(dry)
int16_out(out)
```